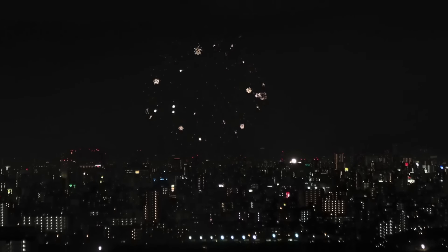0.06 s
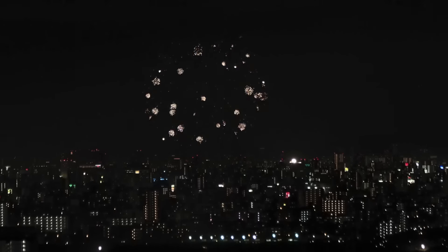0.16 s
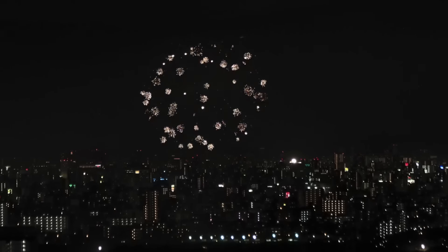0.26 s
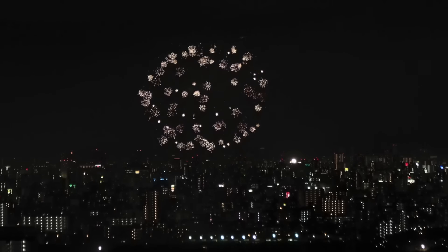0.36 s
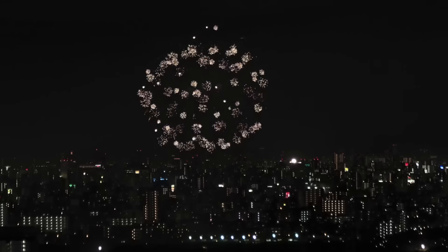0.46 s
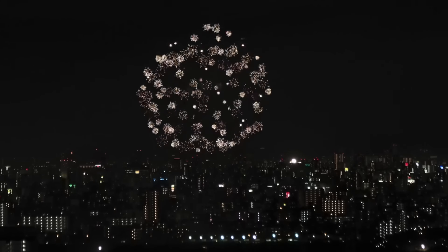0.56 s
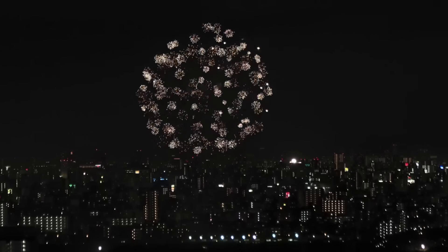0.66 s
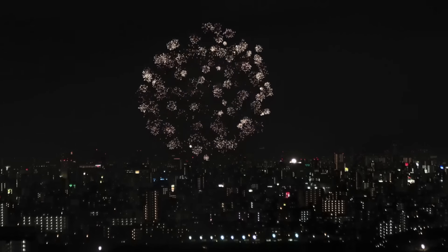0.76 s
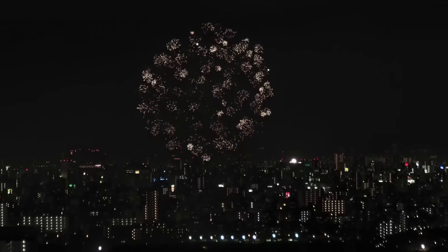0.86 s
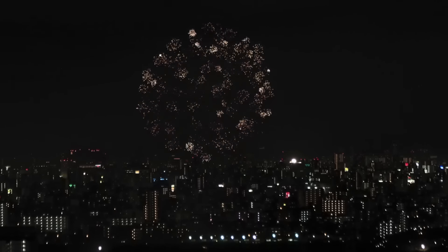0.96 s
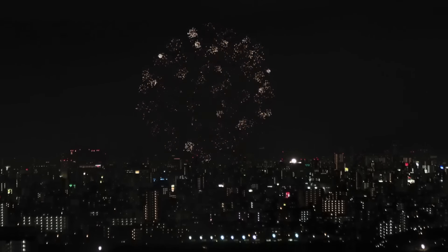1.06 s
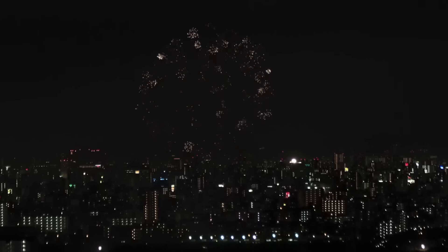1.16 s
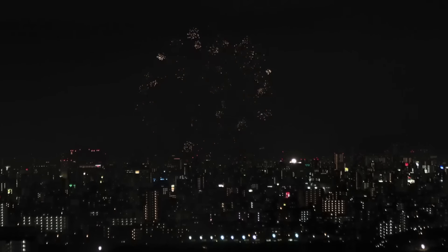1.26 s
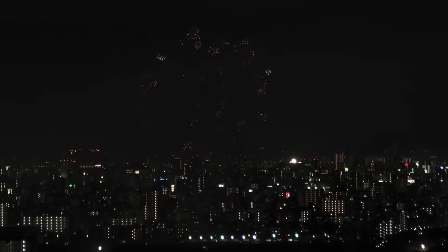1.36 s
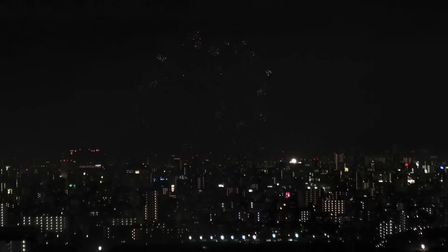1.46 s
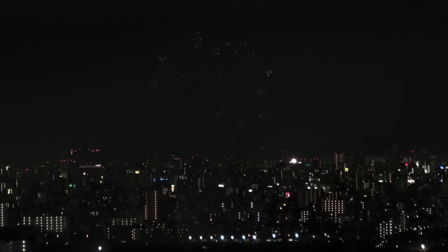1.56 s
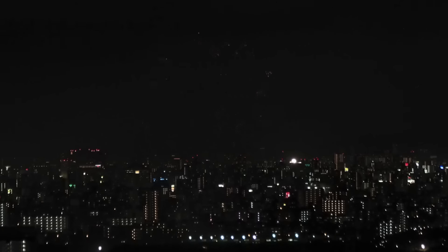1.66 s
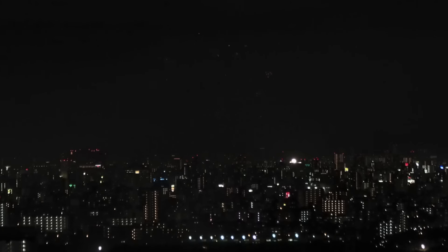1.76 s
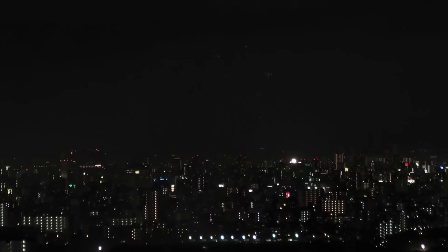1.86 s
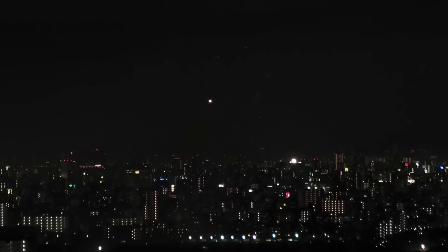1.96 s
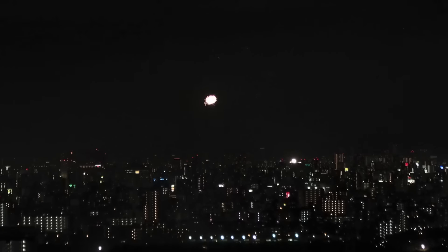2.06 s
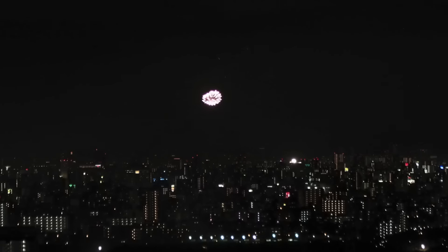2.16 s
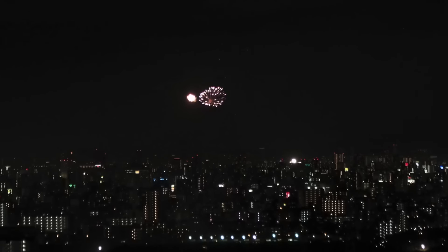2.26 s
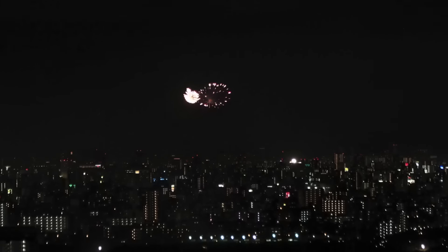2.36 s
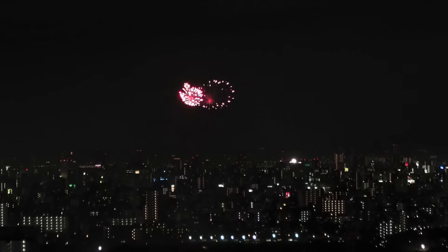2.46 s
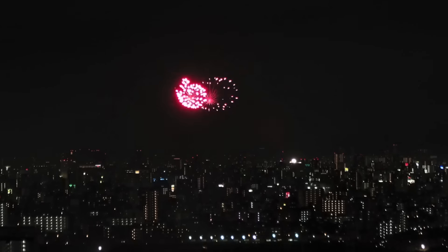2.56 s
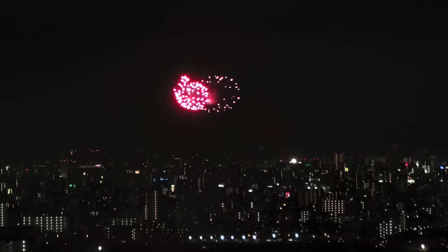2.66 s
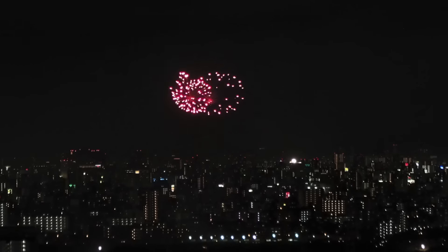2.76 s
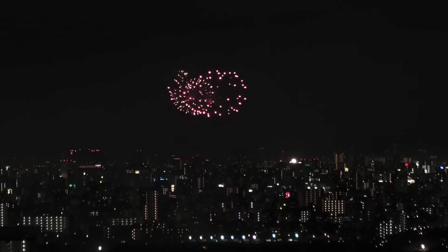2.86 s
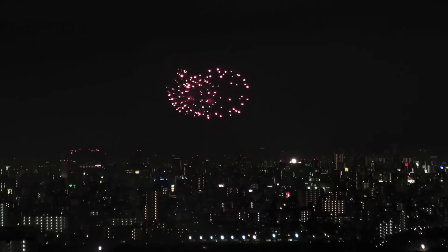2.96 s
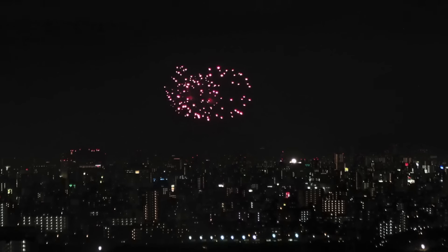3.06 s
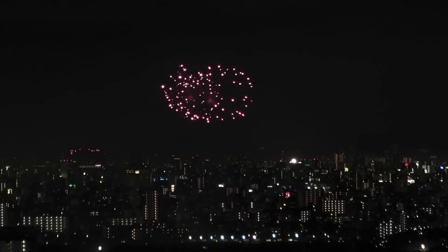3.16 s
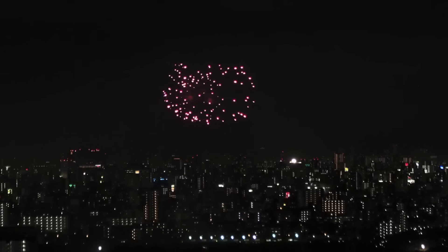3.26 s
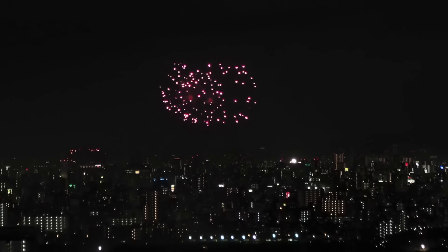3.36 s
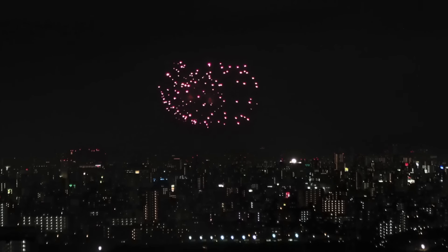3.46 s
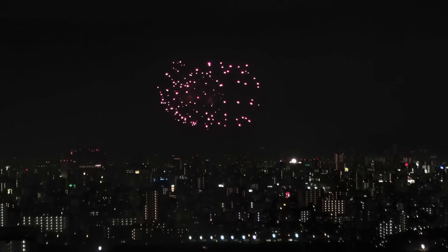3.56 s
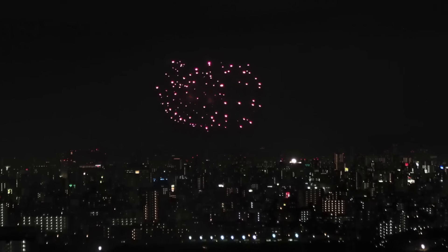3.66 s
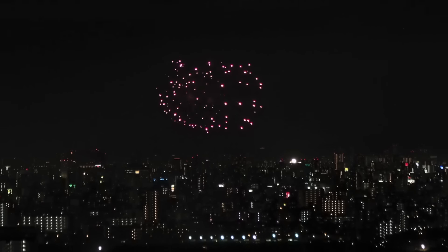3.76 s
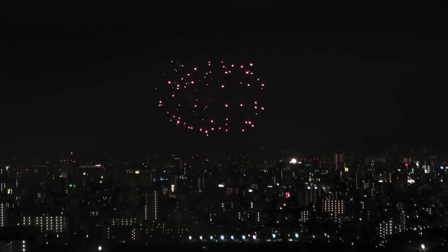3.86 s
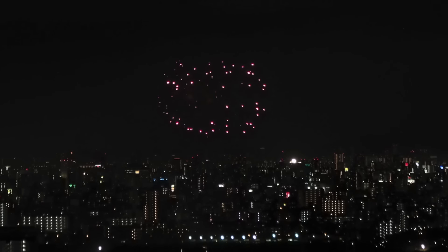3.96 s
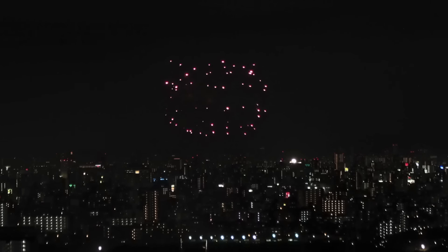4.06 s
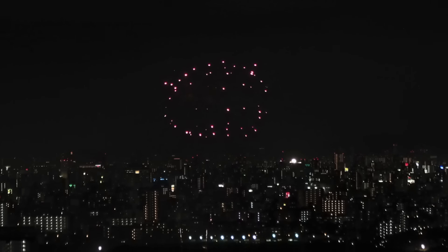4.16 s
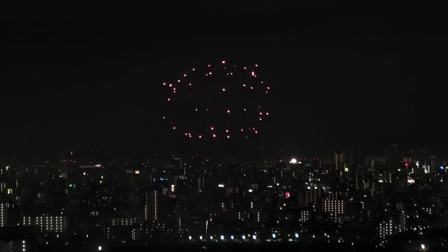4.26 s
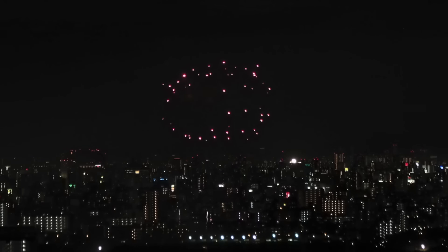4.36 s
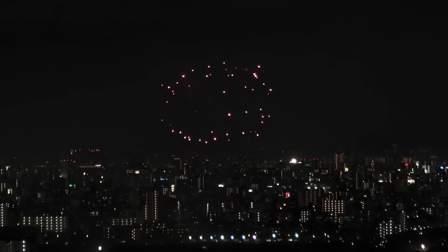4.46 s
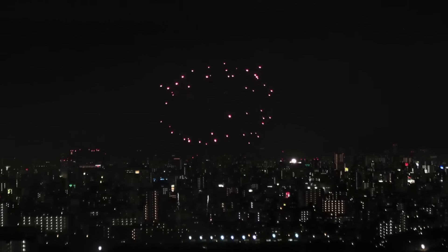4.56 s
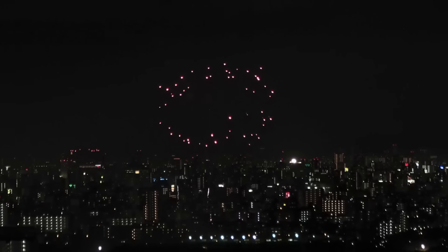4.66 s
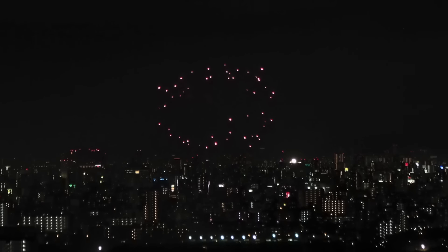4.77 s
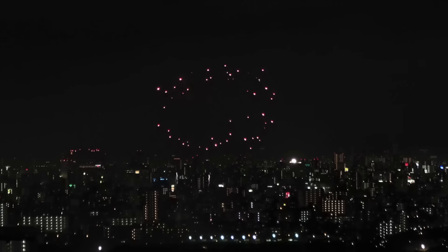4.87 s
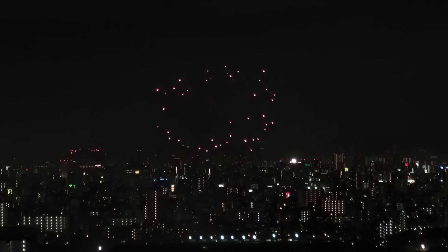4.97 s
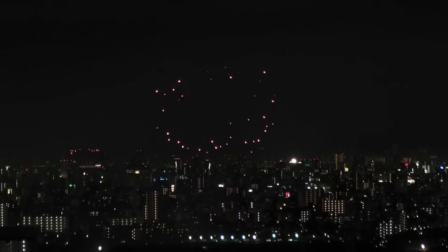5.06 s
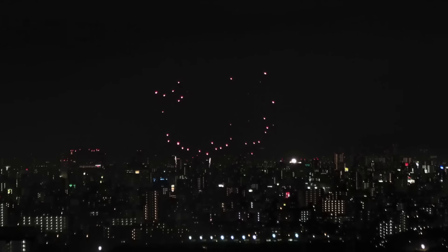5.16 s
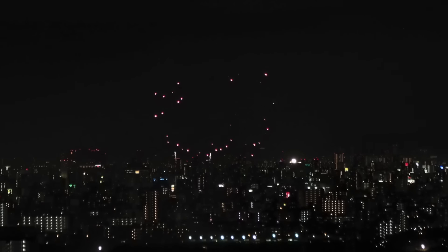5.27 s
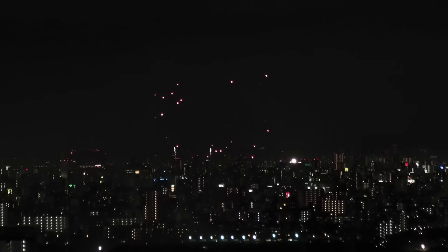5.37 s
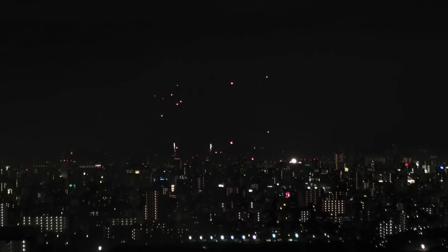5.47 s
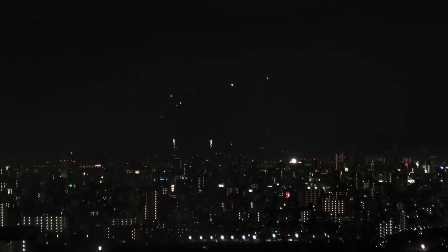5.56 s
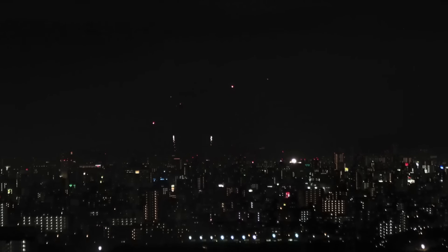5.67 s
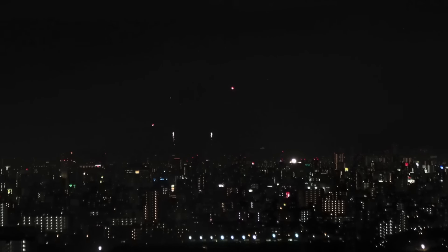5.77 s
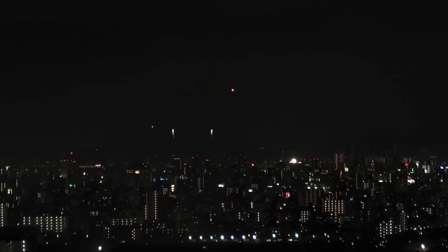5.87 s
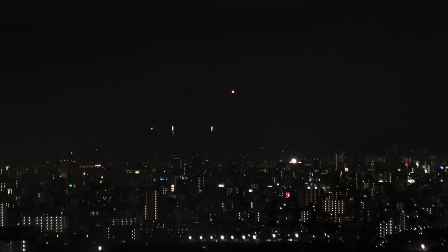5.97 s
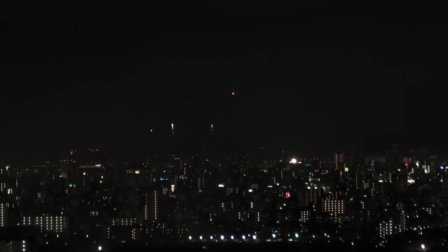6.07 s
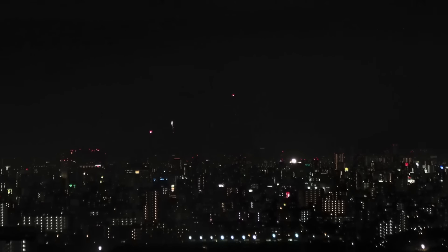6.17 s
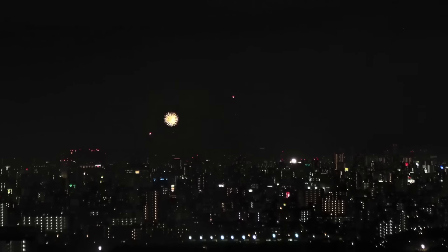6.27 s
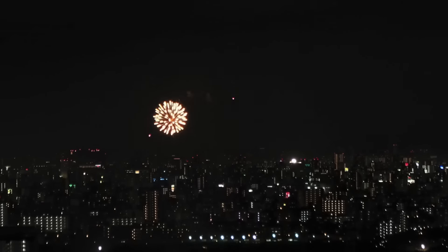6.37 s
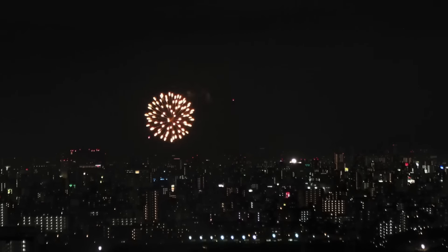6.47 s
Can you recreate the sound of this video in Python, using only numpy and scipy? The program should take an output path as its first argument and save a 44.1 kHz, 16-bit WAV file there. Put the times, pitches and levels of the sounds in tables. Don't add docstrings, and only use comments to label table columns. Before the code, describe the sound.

Two pairs of distant firework blasts boom over a night city, with ragged cracks and short echoes above low traffic rumble and faint hiss.

```python
import sys
import numpy as np
from scipy import signal
from scipy.fft import rfft, irfft, next_fast_len
from scipy.io import wavfile
from scipy.ndimage import uniform_filter1d

SR = 44100
rng = np.random.default_rng(int(sys.argv[2]) if len(sys.argv) > 2 else 0)


def wav_record(signal):
    frames = np.transpose(np.atleast_2d(signal))
    bounded = np.clip(frames, -1, 1)
    quanta = np.round(bounded * 32767).astype(np.int16)
    wavfile.write(sys.argv[1], SR, quanta)


def voltage_ratio(decibels):
    exponent = np.asarray(decibels, float) / 20
    return 10 ** exponent


N = 287091

# (frequency [Hz], level [dB])
HISS_COLOUR = [(1000, -4.5), (4000, 1), (7000, -5.5), (9000, -0.5), (12500, -0.5), (16000, 0)]
# (frequency [Hz], level [dB])
WHINES = [(6988, -88), (12565, -95)]
# (frequency [Hz], level per Hz [dB])
WASH_COLOUR = [(20, -39), (40, -6), (68, -2), (95, 4.5), (145, -2.5), (220, -6.5), (400, -13), (700, -14),
               (1150, -22.5), (1350, -25), (2300, -26), (2700, -30.5), (5000, -39.5), (7000, -49),
               (16000, -68)]
# (frequency [Hz], likeness [0-1])
WASH_LIKENESS = [(30, 0.97), (100, 0.93), (400, 0.88), (800, 1), (1500, 1), (3000, 0.58), (6000, 0.52)]
# (centre [Hz], width [Hz], steadiness [0-1])
HOLLOWS = [(81.1, 2.6, 0.79), (113.1, 17.8, 0.1), (178, 16.7, 0.56)]
DRONE_DB = [-37, -37, -44.5]
# (centre [Hz], width [Hz], level [dB])
NOOKS = [(57.5, 5.4, -47), (238, 14, -60.5), (356.3, 10, -58), (802, 63, -56), (1033, 197, -51),
         (1563, 320, -59.5)]
# (closest time [s], half length [s], level [dB], engine note [Hz])
PASSES = [
    (2.2, .5, -35, 88),
    (2.75, .4, -39.5, 178),
    (3.6, .6, -38.5, 178),
    (5.6, .4, -37, 95.6),
    (6.1, .3, -44.5, 170),
]
# (time [s], level [dB])
BURSTS = [
    (0.5064, 35.5),
    (0.8233, 50),
    (4.7227, 50.5),
    (5.0145, 48),
]
# (roof lag [ms], roof level [dB], wall lag [ms], wall level [dB])
PATHS = [(2.95, 5.5, 11.1, 5), (3.96, -10.5, 10.5, -6), (2.62, 4, 6.62, -6.5), (2.59, 7, 6.76, -4)]
# (level [dB], brightness [dB per octave])
CRACKLES = [(-35, -1.5), (-34, 1), (-29.5, -0.85), (-29.5, -1.1)]
# (streets level [dB], their centre [Hz], towers level [dB], their centre [Hz])
RETURNS = [(-10, 350, -18, 275), (-21, 322, -24, 330), (-26, 280, -18, 130), (-25.5, 260, -14.5, 121)]
# (centre [Hz], width [Hz], level [dB])
BALCONY = [(92, 4.2, -1), (114, 14.4, 4), (179.5, 24, 7.5), (239, 10.2, 3.5), (292, 9.1, -9.5),
           (338, 16, -6.5), (500, 76, -4), (787, 37, -4), (1110, 270, -7)]
# (frequency [Hz], T60 [s])
STREETS_T60 = [(60, 0.93), (150, 0.48), (300, 0.41), (450, 0.3), (1500, 0.22)]
# (frequency [Hz], level [dB])
CRACK_COLOUR = [(300, -32), (430, -2), (540, 9), (670, -7), (820, -5.5), (930, -2.5), (1060, -5.5),
                (1350, -21), (1650, -15.5), (2250, -23.5), (2700, -31.5), (6000, -67.5)]
# (frequency [Hz], T60 [s])
CRACK_T60 = [(500, 0.25), (1200, 0.28), (2200, 0.29)]


def evened(x):
    return x / np.sqrt(np.mean(x ** 2) + 1e-20)


def read(points, hz):
    f, value = np.transpose(points)
    return np.interp(np.log(hz + 1), np.log(f + 1), value)


def ringing(hz, centre_hz, width):
    return 1j * hz * width / (centre_hz ** 2 - hz ** 2 + 1j * hz * width)


def hiss():
    size = next_fast_len(N)
    t = np.arange(N) / SR
    colour = voltage_ratio(read(HISS_COLOUR, np.fft.rfftfreq(size, 1 / SR)))
    noise = irfft(rfft(rng.standard_normal((2, size))) * colour, size)[:, :N]
    tones = sum(np.sqrt(2) * voltage_ratio(db) * np.sin(2 * np.pi * f * t) for f, db in WHINES)
    return voltage_ratio(-59.5) * evened(noise - 0.026 * noise[::-1]) + tones


def wash():
    frames = N // 512 + 5
    hz = np.fft.rfftfreq(2048, 1 / SR)
    a, b, c, d, patches = rng.standard_normal((frames, 1025, 5)).T
    patches = uniform_filter1d(patches, 12, 0)
    patches = evened(uniform_filter1d(patches, 10, 1))
    same = np.clip(read(WASH_LIKENESS, hz), -1, 1)[:, None]
    left = a + 1j * b
    right = same * left + np.sqrt(1 - same ** 2) * (c + 1j * d)
    spectrum = np.array([left, right]) * voltage_ratio(read(WASH_COLOUR, hz)[:, None] + 0.77 * patches)
    noise = signal.istft(spectrum, nperseg=2048, noverlap=1536)[1][:, :N]
    return voltage_ratio(-37.5) * evened(noise)


def murmur(centre_hz, width, steadiness, apart):
    size = next_fast_len(N)
    hz = np.fft.rfftfreq(size, 1 / SR)[:size // 8]
    common, left, right = rng.standard_normal((3, len(hz))) + 1j * rng.standard_normal((3, len(hz)))
    ears = common + apart * np.array([left, right])
    x = np.fft.ifft(ears * ringing(hz, centre_hz, width) ** 2, size)
    swing = abs(x).mean(0) + 1e-12
    steadied = x / swing ** np.clip(steadiness, 0, 1)
    return evened(steadied.real[:, :N])


def rumble():
    note_spread = 0.42
    t = np.arange(N) / SR
    loud = 0
    for drone_db, (hz, width, steadiness) in zip(DRONE_DB, HOLLOWS):
        power = voltage_ratio(drone_db) ** 2
        for closest_s, half_s, db, note_hz in PASSES:
            nearness = np.exp(-(np.log2(hz / note_hz) / note_spread) ** 2)
            swell = 1 / (1 + ((t - closest_s) / half_s) ** 2) ** 2
            power = power + voltage_ratio(db) ** 2 * nearness * swell
        loud = loud + np.sqrt(power) * murmur(hz, width, steadiness, apart=0.029)
    faint = sum(voltage_ratio(db) * murmur(f, width, steadiness=0.087, apart=.05 + f / 1500)
                for f, width, db in NOOKS)
    return loud + faint


def scatter(t60, rise_s, every):
    t = np.arange(SR // 2) / SR
    signs = rng.choice([-1., 1.], (3, len(t)))
    hits = (rng.random((3, len(t))) < 1 / every) * signs
    taps = (hits[0] + 0.11 * hits[1:]) * (1 - np.exp(-t / rise_s)) ** 2
    hz, frame_s, z = signal.stft(taps, SR, nperseg=256)
    decay = voltage_ratio(-60 * frame_s / read(t60, hz)[:, None])
    tail = signal.istft(z * decay, SR, nperseg=256)[1]
    return tail / np.sqrt(np.sum(tail[0] ** 2))


def delay(hz, s):
    return np.exp(-2j * np.pi * hz * s)


def shock_wave(hz):
    blast_hz, air_hz = 92, 300
    push_pull = 1j * hz * blast_hz / (1j * hz + blast_hz) ** 2
    return push_pull / (1 + 1j * hz / air_hz) ** 2 / (1 + (hz / 1800) ** 4)


def street_echoes(hz, size, centre_hz):
    echoes = rfft(scatter(STREETS_T60, rise_s=0.0037, every=140), size)
    return echoes * ringing(hz, centre_hz, 0.42 * centre_hz) ** 2


def tower_return(hz, size, centre_hz, balcony):
    smear = rfft(scatter([(100, 0.4)], rise_s=0.002, every=60), size)
    thud = (1 + 1.68 * smear) * delay(hz, .246)
    return thud * ringing(hz, centre_hz, 0.72 * centre_hz) ** 2 * (0.83 + 0.19 * balcony)


def ragged_crack(hz, size, level_db, bright_db):
    cluster = rfft(scatter(CRACK_T60, rise_s=0.0018, every=52), size)
    return voltage_ratio(level_db + 50.0 + bright_db * np.log2(1 + hz / 700)) * cluster


def fireworks():
    size = next_fast_len(N + SR)
    hz = np.fft.rfftfreq(size, 1 / SR)
    balcony = sum(voltage_ratio(db) * ringing(hz, f, width) for f, width, db in BALCONY)
    booms = cracks = 0
    for (s, db), path, (crackle_db, bright_db), returns in zip(BURSTS, PATHS, CRACKLES, RETURNS):
        roof_ms, roof_db, wall_ms, wall_db = path
        streets_db, streets_hz, towers_db, towers_hz = returns
        roofs = 1 + voltage_ratio(roof_db) * delay(hz, roof_ms / 1000)
        near = roofs * (1 + voltage_ratio(wall_db) * delay(hz, wall_ms / 1000))
        streets = voltage_ratio(streets_db + 22.0) * street_echoes(hz, size, streets_hz)
        towers = voltage_ratio(towers_db + 7.0) * tower_return(hz, size, towers_hz, balcony)
        booms = booms + voltage_ratio(db) * delay(hz, s) * (near * balcony + streets + towers)
        cracks = cracks + delay(hz, s) * ragged_crack(hz, size, crackle_db, bright_db)
    microphone_hz = 32
    bass_cut = (1j * hz / (1j * hz + microphone_hz)) ** 2 * hz ** 2 / (hz ** 2 + 36 ** 2)
    booms = booms * shock_wave(hz) * bass_cut * voltage_ratio(-0.5)
    return irfft(booms + cracks * voltage_ratio(read(CRACK_COLOUR, hz)), size)[:, :N]


def scene():
    left, right = fireworks() + rumble() + wash()
    lag = 3
    left = voltage_ratio(.45) * np.pad(left, (lag, 0), "edge")[:N]
    return np.array([left, right])


def roll_off(x):
    return signal.sosfilt(signal.butter(12, 16580, fs=SR, output="sos"), x)


def record(dry):
    x = dry + hiss()
    squeezed = x / (1 + x ** 6) ** (1 / 6) * 1.06
    edge = signal.ellip(14, .1, 70, 15730, fs=SR, output="sos")
    limited = signal.sosfiltfilt(edge, squeezed, padtype="even")
    mix = np.clip(limited - .004, -1, 1)
    return roll_off(mix)


dry = scene()
out = record(dry)
wav_record(out)
```